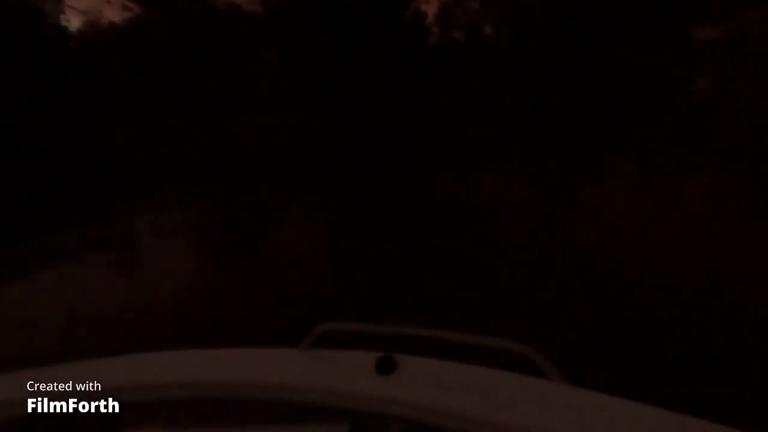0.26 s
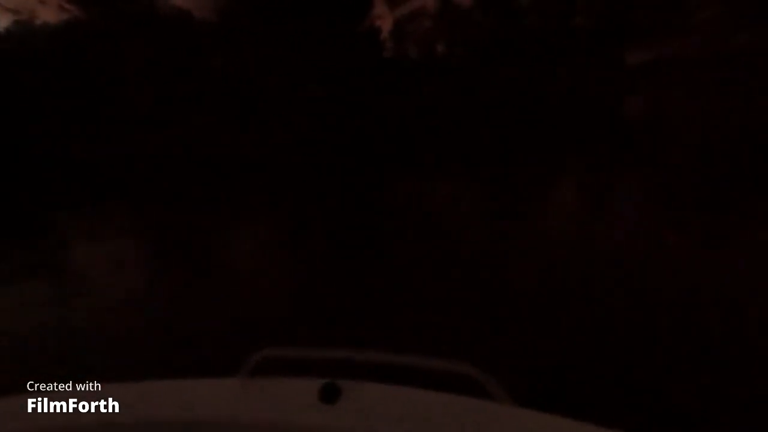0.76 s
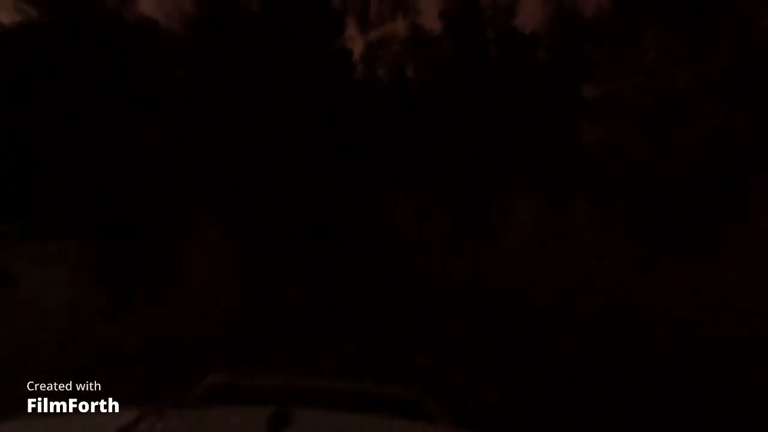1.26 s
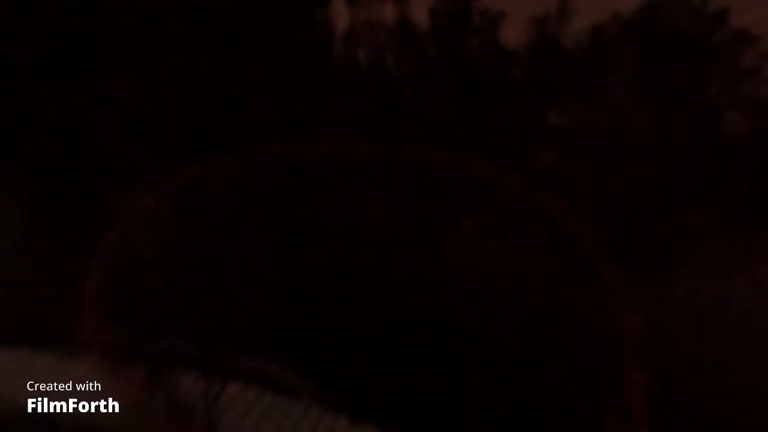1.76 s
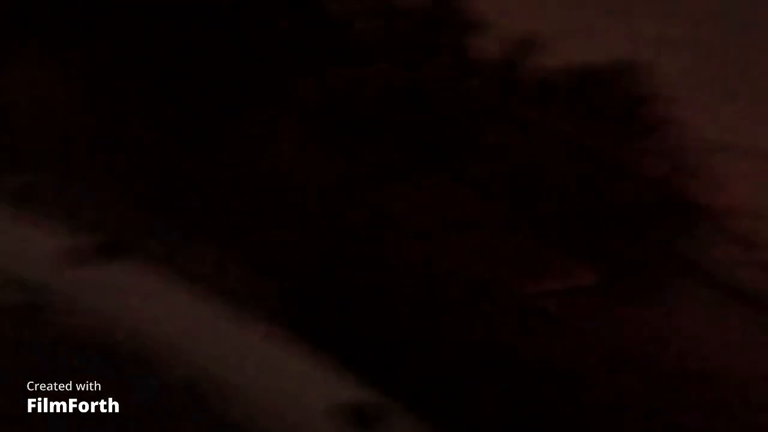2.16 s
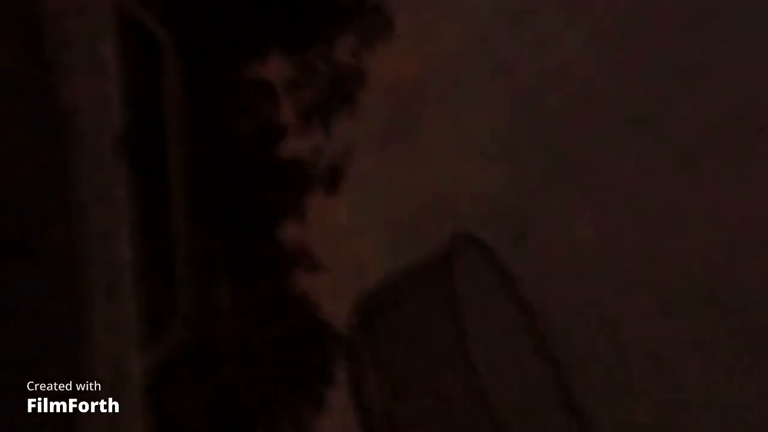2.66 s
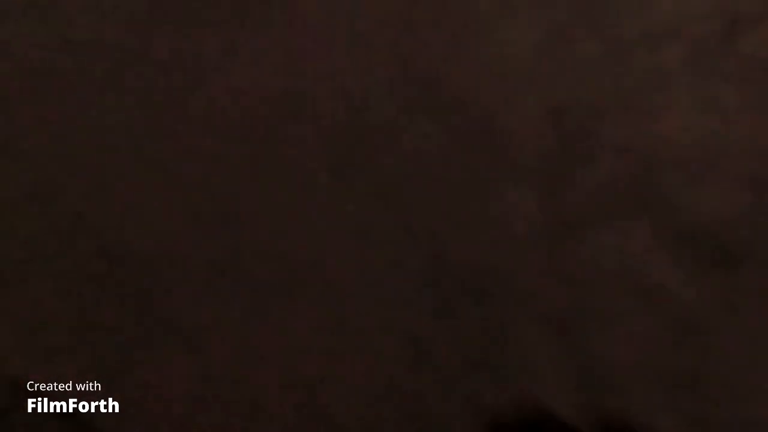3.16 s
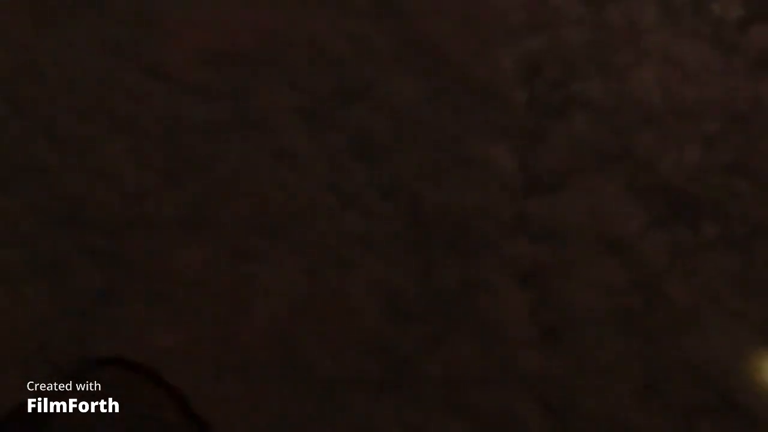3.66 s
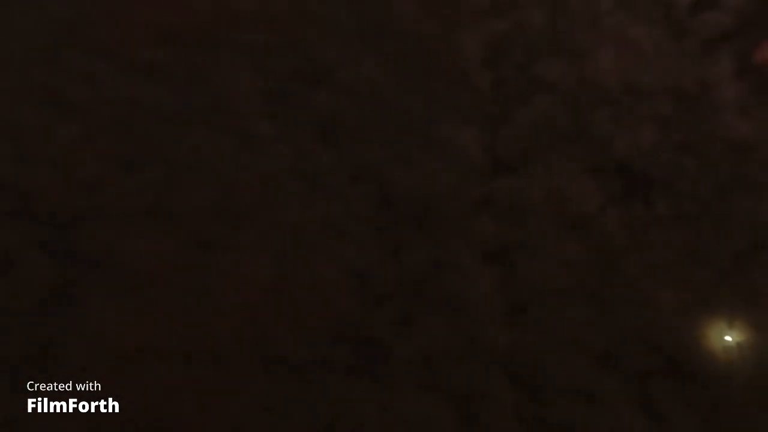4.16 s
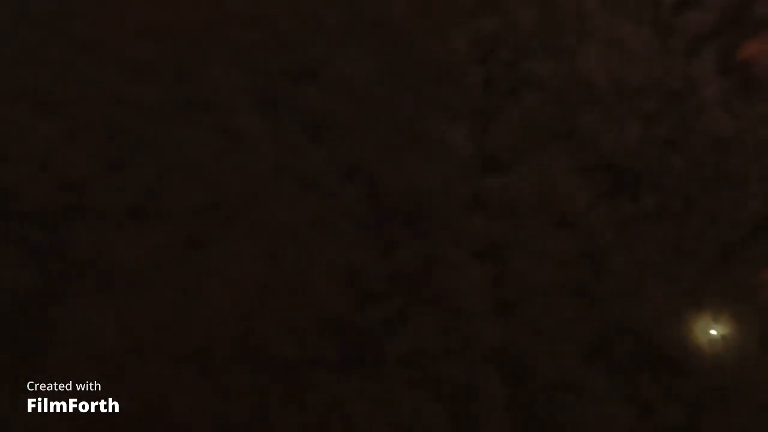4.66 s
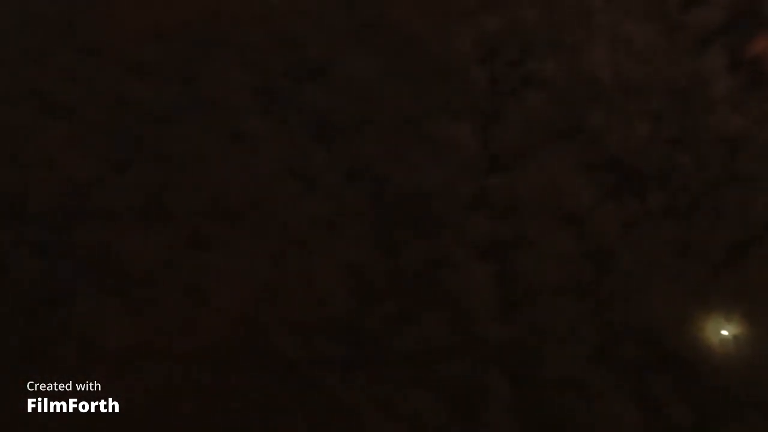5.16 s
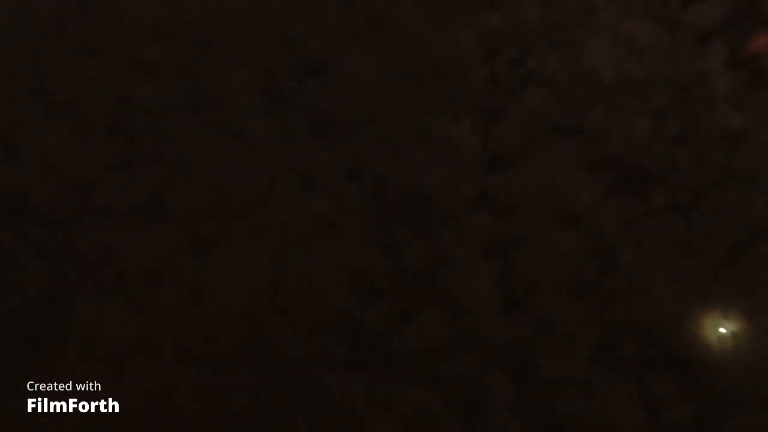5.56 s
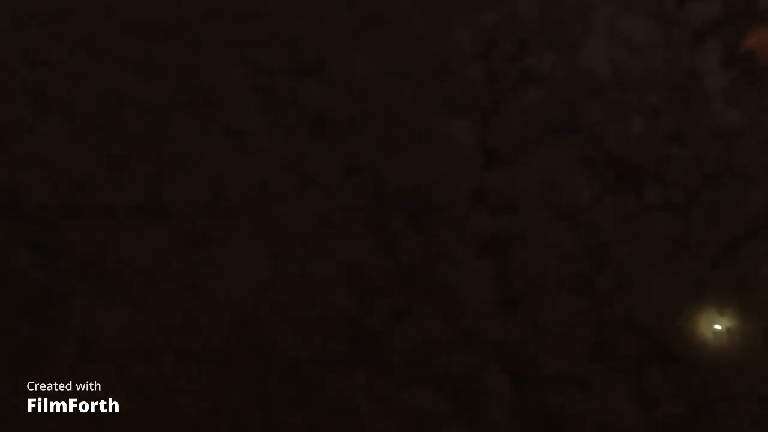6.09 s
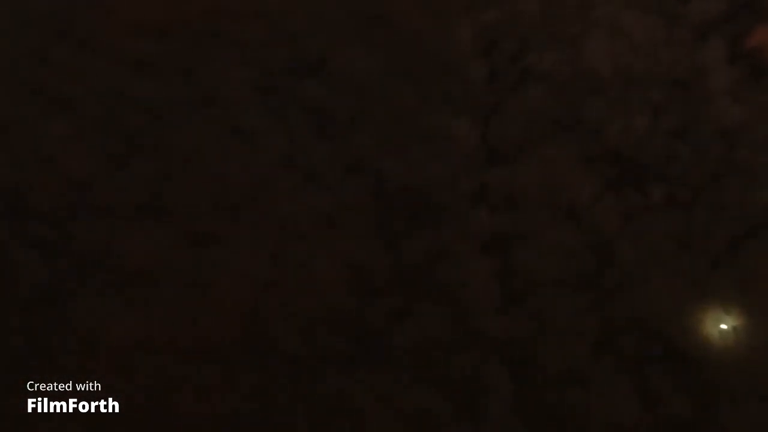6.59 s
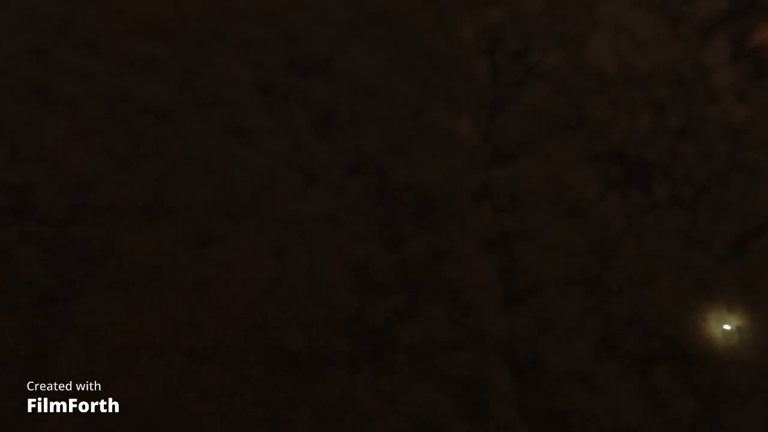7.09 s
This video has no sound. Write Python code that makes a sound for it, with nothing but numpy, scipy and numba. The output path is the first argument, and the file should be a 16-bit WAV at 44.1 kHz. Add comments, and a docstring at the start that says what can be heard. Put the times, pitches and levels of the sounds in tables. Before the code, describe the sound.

From 0 to 2 seconds, two distant insect choirs hold a steady, high, rapidly throbbing hiss in wide stereo over a quiet night lake. Soft low lurches, drips and bright plinks sound in a metal boat around 0.5 to 1 second, with a faint thin rub near 1.5 and watery plops just after 1.9. From 2.1 to 2.7 the boat tips: deep rumble, gurgles, brushing swishes and dull thumps. At 3.1 to 3.4 come the loudest bumps and hard hollow knocks as the microphone is jostled. After about 3.5 it is covered: insects fade to a muffled trace and the image narrows. Close sloshing and bubbling gulps continue, strong near 3.7, 4.3, 5.2 and 6.1, with soft hull thuds, ticks and a small squeak at 6.1. A sharp knock lands near 6.45, a thump near 6.6, then water thins out before a last dull bump at 7.25.

```python
"""Two insect choirs drone over a lake at night: throbbing band noise, heard by a small recorder aboard a metal boat.
Water drips and gurgles in the hull: gliding damped sines and band noise. The boat tips; the recorder rumbles and
swishes (swelling noise), is knocked about (contact noise and hull modes) and ends up covered: choirs muffled,
both ports alike, water sloshing close by and dull bumps (damped sines) coming through the hull."""
import sys
import numpy as np
from scipy import signal
from scipy.io import wavfile
from scipy.ndimage import uniform_filter1d
from numba import njit

SR = 44100
rng = np.random.default_rng(int(sys.argv[2]) if len(sys.argv) > 2 else 0)


def volts_from_decibels(level):
    """Turn decibel levels (scalar or array-like) into linear amplitude factors."""
    exponent = np.asarray(level, float) / 20
    return 10 ** exponent


def wav_record(signal):
    """Record a signal, one row per channel, as 16-bit PCM in the file named by sys.argv[1]."""
    frames = np.transpose(np.atleast_2d(signal))
    bounded = np.clip(frames, -1, 1)
    # unit amplitude maps onto the largest positive 16-bit level
    quanta = np.round(bounded * 32767).astype(np.int16)
    wavfile.write(sys.argv[1], SR, quanta)


N = 323253
T = np.arange(N) / SR
COVERED_S = 3.47  # pairs of settings below are (open, covered)

# Table values are nominal: the functions trim levels, times and pitches.
# how open the microphone lies: t/s, low choir level/dB, high choir level/dB
CHOIR_LEVELS = [(0, -58.5, -55), (.84, -57.5, -58.5), (1.61, -58, -54), (2.33, -59, -57.5),
                (2.88, -62, -61.5), (3.2, -74, -71), (3.4, -81, -83), (3.82, -63.5, -70), (4.35, -87, -84),
                (5.5, -74, -81), (6.0, -79, -87), (6.45, -75, -77), (6.96, -72.5, -78.5),
                (7.33, -70.5, -73)]
# how unlike the ports hear: t/s, side-mid level/dB, bass side-mid level/dB, bass left-right level/dB
PORT_SPREAD = [(0, -4.5, -18, -1), (1.8, -5, -12, -2.5), (2.1, -5.5, -9.5, -4), (3.45, -4, -10, -3),
               (3.55, -17, -35, 1), (3.6, -13.5, -49, -0.5), (3.95, -32, -50, 0), (5.75, -37.5, -37, -2),
               (6.0, -15.5, -52, 0), (6.5, -11, -45, -0.5), (6.9, -9, -34, 0.5), (7.33, -10, -36, 0)]


def curves(table):
    """Columns of a table joined by straight lines in time."""
    s, *columns = np.transpose(table)
    return [np.interp(T, s, c) for c in columns]


def unit(x):
    """Scale to rms 1."""
    return x / np.sqrt(np.mean(x ** 2))


def noise():
    """White noise."""
    return rng.standard_normal(N)


@njit
def svf(x, hz, width):
    """State-variable band-pass whose centre and width may move."""
    y, b, l = np.empty(len(x)), 0., 0.
    for i in range(len(x)):
        g, k = np.tan(np.pi * hz[i] / SR), width[i] / hz[i]
        v = (b + g * (x[i] - l)) / (1 + g * (g + k))
        b, l, y[i] = 2 * v - b, l + 2 * g * v, k * v
    return y


def band(x, hz, width):
    """Steep band-pass: the same resonance twice."""
    hz, width = hz * np.ones(len(x)), width * np.ones(len(x))
    return svf(svf(x, hz, width), hz, width)


@njit
def rings(s, size, hz, t60, glide, rise):
    """Damped sines that swell in over rise seconds and glide by octaves per s; each stops at its t60."""
    y = np.zeros(N)
    for e in range(len(s)):
        i0, phase = int(s[e] * SR), 0.
        for i in range(min(int(t60[e] * SR), N - i0)):
            t = i / SR
            phase += 2 * np.pi * hz[e] * 2 ** (glide[e] * t) / SR
            y[i0 + i] += size[e] * np.sin(phase) * 1000 ** (-t / t60[e]) * min(1., t / rise)
    return y


def walk(rate):
    """Random levels held 1 / rate s and slewed twice; spread near 1."""
    k = int(SR / rate)
    held = np.repeat(rng.standard_normal(N // k + 1), k)
    return 1.32 * uniform_filter1d(uniform_filter1d(held, k), k)[:N]


def wavering(hz, spread, rate):
    """A tone of rms 1 whose pitch wanders."""
    return np.sqrt(2) * np.sin(2 * np.pi * np.cumsum(hz * (1 + spread * walk(rate))) / SR)


def swells(s, db, rise, fall):
    """Gain of overlapping swells, each climbing 20 dB in rise s to its peak and sinking 20 dB in fall s."""
    t = T[::64, None] - s
    slope = np.minimum(t / np.maximum(rise, .003), -t / np.maximum(fall, .003))
    power = volts_from_decibels(2 * (db + 20 * slope))
    return np.interp(T, T[::64], np.sqrt(power.sum(axis=1)))


def ports(mid, side, extra_db=0, axis=0):
    """Left and right from a common part and an unlike part that fades when the casing is covered."""
    return mid + volts_from_decibels(curves(PORT_SPREAD)[axis] + extra_db) * side * np.array([[1], [-1]])


def panned(x, s, pan_db, axis=1):
    """One sound leaning left or right, less so the more alike the ports hear."""
    spread = np.transpose(PORT_SPREAD)
    pan_db = pan_db * min(1, volts_from_decibels(np.interp(s, spread[0], spread[axis]) + 4.5))
    return x * volts_from_decibels(np.array([[pan_db], [-pan_db]]) / 2)


def insects():
    """Distant choirs: narrow hiss throbbing with the wing strokes of the nearest singers."""
    # choir bands: f/Hz, width/Hz, throb rate/Hz
    choir_bands = [(4120, 680, 58), (6760, 820, 58), (7434, 470, 43)]
    low_db, high_db = curves(CHOIR_LEVELS)
    out = 0
    for (hz, width_hz, rate_hz), db in zip(choir_bands, (low_db, high_db - 3, high_db - 8.5)):
        throb_phase = 2 * np.pi * np.cumsum(rate_hz * (1 + 0.0638 * walk(4.6))) / SR
        throb = 1 + 0.27 * np.sin(throb_phase)
        mid, side = (unit(band(noise(), hz, width_hz)) for _ in range(2))
        out = out + volts_from_decibels(db - 3.5 + 0.26 * walk(14.0)) * throb * ports(mid, side, -5.5)
    return out


def night():
    """Smooth floor in half-octave bands, and a faint wavering hum."""
    # floor spectrum: f/Hz, relative density/dB
    floor_spectrum = [(120, -31), (200, 4), (282, -4), (512, -17), (708, -70.5), (1130, -12), (2850, -29),
                      (4240, -32), (5170, -69), (7020, -50.5), (15000, -77)]
    # hum coming and going: t/s, level/dB
    hum_levels = [(0, -70), (1.5, -68.5), (4.3, -76), (4.6, -60.5), (5.0, -72), (6.4, -70.5), (6.8, -60),
                  (7.33, -56)]
    floor_db, hum_hz = -70.5, 174.4
    spectrum_hz, spectrum_db = np.transpose(floor_spectrum)
    floor = 0
    for hz in 220 * 2 ** np.arange(0, 6.1, .5):
        db = np.interp(np.log(hz), np.log(spectrum_hz), spectrum_db) + 1.5 * walk(6)
        floor = floor + volts_from_decibels(db) * ports(band(noise(), hz, hz / 2), band(noise(), hz, hz / 2))
    hum = 0.93 * wavering(hum_hz, 0.0432, 25) + 0.48 * unit(band(noise(), hum_hz, 40))
    return volts_from_decibels(floor_db) * unit(floor) + volts_from_decibels(curves(hum_levels)[0]) * hum


def gurgles():
    """Gain of the big bubbles, their centre, and gain of the small bubbles each gulp throws on the casing."""
    # gulps against the hull: peak t/s, level/dB, 20 dB fall/s, centre f/Hz, small-big bubbles level/dB
    gulps = [(.25, -69, 0.42, 470, -21), (.47, -52, 0.05, 370, -5.5), (.72, -80, 0.086, 600, 2),
             (1.26, -68, 0.3, 420, -29), (1.34, -76, 0.027, 710, -24), (1.43, -66, 0.15, 730, -9),
             (1.689, -66.5, 0.12, 457, -17), (1.83, -68, .06, 385, -2), (1.94, -53, 0.032, 660, 13),
             (2.17, -50, 0.034, 378, -11), (2.218, -49, 0.029, 373, -20), (2.29, -49.5, 0.12, 376, -17),
             (2.52, -70, 0.036, 345, -21), (2.6, -64, .2, 367, -16), (3.05, -62, .1, 354, -13),
             (3.25, -43, 0.3, 374, -8), (3.439, -43, 0.043, 400, -21), (3.569, -49, 0.21, 600, -4.5),
             (3.667, -33.5, 0.064, 441, -12), (3.73, -42, 0.072, 477, -4.5), (3.82, -47.5, 0.22, 593, -13),
             (4.0, -55.5, 0.67, 540, -18), (4.142, -38.5, 0.029, 534, -4), (4.27, -58, 0.041, 443, 10),
             (4.337, -36.5, 0.061, 570, 1), (4.53, -52, 0.34, 600, -14), (4.618, -50, 0.025, 623, 1),
             (4.902, -43, 0.087, 484, -13), (4.99, -42.5, 0.17, 412, -17), (5.048, -48, 0.033, 576, -7),
             (5.15, -61.5, .03, 510, 15), (5.22, -33.5, 0.077, 375, -7), (5.268, -31.5, 0.049, 464, -13),
             (5.34, -41, 0.36, 503, -11), (5.52, -42, 0.2, 497, -21), (5.64, -60, 0.16, 560, -6),
             (5.7, -62, 0.028, 727, 11), (5.911, -52, 0.15, 670, 6), (6.01, -40.5, .1, 613, -12),
             (6.08, -34, 0.2, 550, -13), (6.13, -36.5, 0.035, 500, -9), (6.202, -37.5, 0.48, 550, -15.5),
             (6.288, -36, 0.11, 415, -5), (6.548, -39.5, 0.23, 582, -10.5), (6.65, -59, 0.027, 450, 10),
             (6.72, -50.5, 0.04, 491, 2.5), (6.816, -48, .05, 400, 1.5), (6.925, -60.5, .04, 510, 9),
             (7.08, -69, 0.14, 456, -13), (7.31, -71, .1, 365, 4)]
    s, db, fall, hz, casing_db = np.transpose(gulps)
    rise = 0.54 * fall
    return swells(s, db, rise, fall), np.interp(T, s, hz), swells(s, db + casing_db, rise, fall)


def rumble():
    """Lumpy low noise, uneven between ports: a slow sway, sudden lurches and the thump of big bubbles."""
    # slow sway of the hull: t/s, deep level/dB
    sway_levels = [(0, -46), (.4, -51.5), (.9, -48.5), (1.1, -50.5), (1.35, -58), (1.6, -53), (1.95, -44.5),
                   (2.06, -34), (2.21, -31), (2.4, -26), (2.62, -32), (2.76, -49), (2.9, -31.5), (3.0, -49),
                   (3.32, -38), (3.52, -74), (3.86, -47), (4.06, -88), (4.5, -90), (4.8, -59), (5.8, -73),
                   (6.5, -68), (7.33, -80)]
    # sudden lurches of the hull: peak t/s, level/dB, 20 dB rise/s, 20 dB fall/s, deep part above it/dB
    lurch_swells = [(.16, -39.5, .05, 0.13, -5), (0.472, -35, 0.01, 0.13, -3), (1.53, -43, 0.054, 0.29, 5),
                    (2.139, -23.5, 0.065, 0.089, 0), (2.408, -30.5, 0.035, 0.044, 13),
                    (2.5, -23.5, 0.032, 0.22, 3.5), (2.619, -31, 0.11, 0.077, 10.5),
                    (2.79, -48, 0.043, 0.16, 19.5), (3.071, -30.5, 0.015, .4, -16),
                    (3.3, -35, 0.63, .3, -8), (3.443, -21, 0.38, 0.073, -18),
                    (3.6, -33.5, 0.026, 0.21, -22), (3.7, -34, .1, 0.25, -11),
                    (4.01, -40.5, .06, 0.024, -16), (4.15, -59, .05, 0.049, -4),
                    (4.6, -38.5, 0.091, 0.24, -3), (4.72, -40.5, 0.12, 0.11, -7),
                    (5.05, -42, 0.085, 0.12, -10), (5.43, -32.5, 0.027, 0.11, -10),
                    (6.1, -42.5, 0.1, .15, -14), (6.25, -37.5, .1, 0.19, -5), (6.34, -42, 0.12, 0.073, -15),
                    (6.635, -32, .012, 0.12, -8), (6.7, -33.5, 0.098, .08, -18), (7.03, -75, .05, 0.13, 11),
                    (7.26, -39, .05, 0.66, -6)]
    s, db, rise, fall, deep_db = np.transpose(lurch_swells)
    sway, lurch = volts_from_decibels(curves(sway_levels)[0]), swells(s, db, rise, fall)
    deep = np.hypot(sway * volts_from_decibels(2.0 * walk(18)), swells(s, db + deep_db, rise, fall))
    middle = np.hypot(volts_from_decibels(-12.5 + 4.0 * walk(17)) * sway, lurch)
    upper = volts_from_decibels(-27.5) * sway + volts_from_decibels(-20.5) * lurch + volts_from_decibels(-4.5) * gurgles()[0]
    pair = []
    for _ in range(2):
        deep_part = deep * unit(band(noise(), 29.3, 25))
        middle_part = volts_from_decibels(-5.5) * middle * unit(band(noise(), 84.0, 77.5))
        upper_part = upper * volts_from_decibels(-10.5 + 4.9 * walk(30)) * unit(band(noise(), 228.4, 124))
        pair.append(deep_part + middle_part + upper_part)
    lean_db = curves(PORT_SPREAD)[2]
    return volts_from_decibels(-1.0) * ports(*pair, axis=1) * volts_from_decibels(np.array([lean_db, -lean_db]) / 2)


def slosh(count=3500):
    """Dense bubbles: big ones around a moving centre, small ones ringing the casing, over flickering wash and fizz."""
    # wash over the casing: t/s, level/dB
    wash_levels = [(0, -73), (.8, -69), (1.3, -73.5), (1.75, -70.5), (2.2, -59), (2.5, -60), (2.95, -64.5),
                   (3.25, -55), (3.45, -79), (3.5, -78), (3.75, -52), (4.1, -58.5), (4.3, -54), (4.46, -60),
                   (4.7, -52), (5.1, -57.5), (5.5, -49), (5.69, -47.5), (5.75, -55), (6.2, -57.5),
                   (6.82, -59), (6.88, -68), (7.33, -74)]
    (gulp, centre_hz, thrown), wash = gurgles(), volts_from_decibels(curves(wash_levels)[0])
    fizz_gain = volts_from_decibels(np.where(T > COVERED_S, -7, -2))
    big_gain = volts_from_decibels(-3.0) * gulp + volts_from_decibels(np.where(T > COVERED_S, -11.5, -20)) * wash
    casing_gain = np.hypot(wash, thrown) * volts_from_decibels(-1.0)
    lows, highs = [], []
    for _ in range(2):
        u, g = rng.random((2, count)), rng.standard_normal((4, count))
        e = np.minimum(rng.exponential(size=(2, count)), 4)
        big_hz = centre_hz[(u[0] * N).astype(int)] * 2 ** (0.327 * g[0])
        small_hz = 1300 * 2 ** (0.33 * g[1])
        hz = np.clip([big_hz, small_hz], 150, 4000)
        big, small = (unit(rings(u[k] * T[-1], volts_from_decibels(6.9 * e[k]), hz[k], 18 / hz[k], 5 + 5 * g[2 + k], 0.0026))
                      for k in range(2))
        low_wash = volts_from_decibels(3.2 * walk(35)) * unit(band(noise(), centre_hz, 1.15 * centre_hz))
        casing_wash = volts_from_decibels(1.1 * walk(40)) * unit(band(noise(), 1260, 820))
        low = 0.63 * big + 0.58 * low_wash
        casing = 0.67 * small + 0.67 * casing_wash
        flicker = volts_from_decibels(2.2 * walk(70))
        fizz = fizz_gain * flicker * unit(band(band(noise(), 2240, 3460), 2240, 3460))
        lows.append(big_gain * low)
        highs.append(casing_gain * casing + (wash + volts_from_decibels(-16) * thrown) * fizz)
    return ports(*lows, -14) + ports(*highs)


def brushing():
    """Soft hiss of something brushing the casing: two noise bands swelling over a rest of leaves and air."""
    # strokes: peak t/s, level/dB, 20 dB rise/s, 20 dB fall/s, top band above it/dB
    strokes = [(.84, -65, 1, .5, -14), (1.02, -68, .3, 1, 0), (1.93, -52, .04, 0.092, -6),
               (1.99, -56, .1, 0.037, -19), (2.08, -54.5, .05, .09, -27), (2.16, -47, 0.02, 0.097, -7),
               (2.29, -51, .06, 0.08, -7), (2.41, -45.5, 0.043, 0.078, -16),
               (2.491, -44.5, 0.021, .045, -4), (2.63, -44.5, 0.055, 0.039, -19), (2.7, -58, .05, 0.11, -5),
               (2.88, -59, 0.19, 0.18, -3), (3.06, -50.5, .01, 0.067, -20), (3.11, -53, .03, .06, 1),
               (3.2, -48, 0.13, 0.089, -8), (3.255, -49, .1, .012, -14), (3.32, -54.5, 0.057, 0.044, -12),
               (3.35, -51, 0.009, 0.015, -16), (3.41, -66, 0.013, .011, -19),
               (3.531, -56, 0.0055, 0.045, -9), (3.8, -60, 0.22, .1, -11), (3.84, -57, 0.043, .03, -6),
               (3.88, -61.5, .05, .45, -10), (4.15, -60, 0.02, 0.079, -10), (4.35, -81, .3, 0.049, -1),
               (4.56, -70, .02, .4, -9), (4.75, -60, 0.34, .08, -6), (4.8, -53, .02, 0.042, -5),
               (5.12, -74, .5, .6, -2), (5.58, -65, .02, .07, -27), (5.66, -79, .1, .6, -18),
               (6.03, -82, 0.47, 0.17, 3), (6.27, -52.5, 0.021, 0.044, -13),
               (6.472, -61.5, 0.33, 0.037, -8), (6.722, -63, 0.072, 0.038, -18), (6.8, -71, .1, 0.2, -20),
               (7.27, -68, .05, 0.059, 0.5)]
    s, db, rise, fall, top_db = np.transpose(strokes)
    rest = volts_from_decibels(curves(CHOIR_LEVELS)[0] - 30)  # muffled like the choirs
    hiss_gain = rest + swells(s, db, rise, fall)
    top_gain = volts_from_decibels(4.5) * rest + swells(s, db + top_db, rise, fall)
    pair = []
    for _ in range(2):
        flutter = volts_from_decibels(0.89 * walk(42))
        hiss = hiss_gain * unit(band(noise(), 5390, 3400))
        top = top_gain * volts_from_decibels(-9.0) * unit(band(noise(), 11500, 4700))
        pair.append(flutter * (hiss + top))
    return volts_from_decibels(-5.5) * ports(*pair, 0.8)


def bumps():
    """A bump dents a panel, which swings back gliding in pitch, with an overtone, body ring and lasting boom."""
    # dull thuds: t/s, peak level/dB, f/Hz, glide/(octave/s), left-right level/dB
    thuds = [(.147, -27.5, 70, -2, -3), (0.46, -31, 72, -9, 2), (1.522, -32, 98, -4, 2),
             (2.139, -18.5, 133, 2, -21), (2.419, -20, 114, -4, -11), (2.519, -18.5, 185.6, -3.5, -26.5),
             (2.587, -16.5, 72, -3, -12), (3.103, -0.5, 91, -18, 7), (3.118, -17, 181, -22.5, -16),
             (3.141, -15.5, 94, -9, -11), (3.2439, -11.5, 108, -6.5, -20), (3.273, -16, 114, -11, -8),
             (3.352, -6.5, 101, -15.5, 5.5), (3.402, -13, 116, -9.5, 3), (3.444, -32, 127, -9, 5),
             (3.699, -39, 71.6, 3, 0), (3.825, -39, 174, -14, 0), (4.137, -49.5, 172, -10, 0),
             (4.574, -41, 91.5, 3, 0), (4.63, -33, 71.4, -4.5, 0), (5.021, -38.5, 71.4, -5, 0),
             (5.409, -37, 86.1, -14, 0), (5.487, -35, 115, -8.5, 0), (6.455, -42.5, 190, -12, 0),
             (6.617, -24.5, 85, -1.5, 0), (6.628, -21, 88, 5, 1), (6.664, -28, 74, -1.5, -2),
             (7.24, -30.5, 110, -2, -1), (7.256, -27, 96.4, -3, -4)]
    half_length_glide = 16.3  # octaves per s at which a hard thud is half as long
    body_hz, body_t60_s, boom_hz, boom_t60_s = 345, 0.049, 110, 0.29
    out = 0
    for s, db, hz, glide, pan_db in thuds:
        covered = s > COVERED_S
        short = 1 / (1 + (glide / half_length_glide) ** 2)
        rise = (0.0064, 0.011)[covered] * short * volts_from_decibels(-.7 * max(db + 23.5, 0))
        t60 = (0.061, 0.16)[covered] * short
        body_db, boom_db = (-19.5, -32)[covered], (-18.5, -31)[covered]
        # panel, overtone, body, boom
        starts = s + np.array([0.0029, 0.0023, 0.0045, .006])
        sizes = volts_from_decibels(db + np.array([2.5, -5, body_db, boom_db])) * np.array([1, -1, 1, -1])
        tones_hz = np.array([1.103 * hz, 2.11 * hz, body_hz, boom_hz])
        t60s = np.clip([t60, 0.45 * t60, body_t60_s, boom_t60_s], .01, .5)
        glides = glide * np.array([1., 1, 0, 0])
        tones = rings(starts, sizes, tones_hz, t60s, glides, max(rise, .0005))
        out = out + panned(tones, s, pan_db, axis=2)
    return out


def bubbles():
    """Air pockets pinching off: pure short tones that glide."""
    # single bubbles: t/s, peak level/dB, f/Hz, t60/s, glide/(octave/s)
    pockets = [(.256, -51.5, 535, 0.067, 6), (0.511, -37.5, 1052, 0.084, -2),
               (0.709, -39, 1020, 0.069, 3.5), (.765, -50, 1305, 0.098, 8.5), (0.971, -44, 3110, 0.092, -5),
               (1.07, -51, 1043, .05, -4), (1.648, -41, 3190, 0.057, 3), (1.333, -48, 723, 0.097, 2),
               (1.427, -43.5, 810, 0.071, 33), (1.912, -26.5, 1130, 0.028, -14),
               (1.944, -33, 650, 0.12, -2.5), (1.948, -41.5, 1295, 0.15, 3), (1.982, -39, 1996, .06, 7),
               (2.153, -16.5, 353, 0.042, 5), (3.665, -29, 405, 0.056, 5), (4.305, -31.5, 258, 0.14, 8),
               (5.215, -19.5, 380.6, 0.097, -2.5), (5.264, -23, 505, 0.069, 3), (5.345, -23, 495, 0.046, 0),
               (6.062, -13, 623, 0.026, 18), (6.084, -19, 665, 0.022, 5), (6.145, -20, 380, 0.034, 1),
               (6.198, -22, 202, 0.054, -2), (6.283, -18, 438, 0.04, 2), (6.334, -25, 147, .05, -21)]
    s, db, hz, t60, glide = 1. * np.transpose(pockets)
    return rings(s, volts_from_decibels(db - 2.5), hz, np.clip(t60, .01, .3), glide, 0.0054)


def knocks():
    """Knocks, drips, plops: scattered contact noise in the struck spot's resonance, a crack, hull modes, rattle."""
    # blows: peak t/s, level/dB, f/Hz, treble level/dB, left-right level/dB
    blows = [(.409, -54.5, 6700, 3.5, .5), (0.51, -37.5, 1070, -26, -5), (0.5332, -36.5, 1900, -26, -2),
             (0.542, -36, 1530, -3, -4), (0.666, -43, 4000, -23, -1.5), (0.6897, -38, 3120, -18, -5),
             (0.702, -30, 1690, -9, -4.5), (.897, -38.5, 6200, -11, 2), (.962, -40, 3000, -25, 1.5),
             (.975, -37, 2700, -25, 3), (0.9883, -42, 3700, -24, .5), (1.333, -45, 3800, -7, -2),
             (1.616, -34.5, 1260, -26, 1), (1.645, -36, 3280, -23, .5), (1.915, -33.5, 1030, -14, 0),
             (1.939, -30, 740, -8.5, -1), (1.95, -27, 1830, -29, 0), (1.979, -32.5, 2050, -14, 0),
             (1.9954, -40, 2430, -20, -.5), (2.075, -44.5, 600, -2.5, -2), (2.128, -40.5, 1520, -11, 2),
             (2.154, -27.5, 1430, -15.5, 0), (2.268, -31, 1680, -25, -5), (2.321, -38, 1070, -19, 0),
             (2.384, -48, 649, -3, -10), (2.685, -43, 1030, -6, -5), (2.787, -29.5, 1400, -31, 2),
             (3.056, -41, 1620, -12, 1.5), (3.07, -41.5, 1700, -6, 3), (3.103, -16, 1230, -18, -7),
             (3.244, -10.5, 1090, -18.5, -5), (3.276, -30.5, 1000, -30, 6), (3.338, -30, 1820, -35, -2),
             (3.343, -30, 1840, -37, -5), (3.348, -24, 1840, -24, -7), (3.351, -11, 1450, -11.5, 3),
             (3.403, -21.5, 1660, -25, 2), (3.493, -43.5, 1100, -33, 6), (3.551, -35.5, 594, -25, 10),
             (3.612, -33, 549, -28, 0), (3.662, -25, 555, -31, 1), (3.719, -30, 1310, -20.5, 10),
             (3.827, -17, 1080, -27, -5), (3.877, -36.5, 1050, -20, -4), (4.136, -30.5, 1100, -20, 3),
             (4.165, -42, 2000, -20, 0), (4.214, -42, 980, -26, 0), (4.268, -38, 1250, -36, 0),
             (4.304, -30, 597, -67, 0), (4.328, -22.5, 885, -50, -10), (4.582, -40.5, 720, -10.5, 0),
             (4.615, -40, 1150, -20, 0), (4.741, -39.5, 1250, -12.5, 1), (4.819, -53, 1080, -13, -5),
             (4.882, -40.5, 1100, -26, 0), (4.919, -37.5, 895, -35, 0), (5.053, -38, 966, -30, 0),
             (5.141, -41.5, 1050, -16, -7), (5.214, -30, 490, -40, 0), (5.235, -31.5, 990, -44, 0),
             (5.401, -31.5, 550, -22, -2), (5.458, -32.5, 720, -36, 3), (5.538, -33, 604, -41, 0),
             (5.778, -44, 1090, -29, 8), (5.846, -42.5, 1080, -34, 26), (5.914, -32.5, 900, -44, 3),
             (6.005, -31.5, 810, -29.5, 4), (6.062, -34, 700, -54, 5), (6.418, -37.5, 550, -10, 6),
             (6.451, -27, 958, -48, 6), (6.457, -13.5, 1000, -57, 3.5), (6.673, -40.5, 985, -34, 9),
             (6.713, -44, 610, -26.5, 3), (6.78, -36.5, 828, -37.5, 5), (6.912, -43, 1080, -29, 7)]
    # hull modes: f/Hz, level/dB, t60/s
    hull_modes = [(320, -4.5, 0.02), (630, -29, 0.12), (935, -5, 0.013), (1191, 1.5, 0.032),
                  (1407, -4, 0.034), (2050, -2.5, 0.0052), (2770, 10.5, 0.0041), (4060, 4, 0.0025)]
    lead_s = .03  # rattle starts this long before its peak
    out = np.zeros((2, N))
    t = T[:SR // 8]
    around = t - lead_s
    hull_hz, hull_db, hull_t60 = np.transpose(hull_modes)
    for s, db, hz, treble_db, pan_db in blows:
        covered = s > COVERED_S
        hard = volts_from_decibels(-0.07 * max(db + 25, 0))  # harder blows: shorter contact and ring
        rise = (.0016, 0.0056)[covered] * hard
        t60 = (0.034, 0.045)[covered] * (1000 / hz) ** 0.13 * hard
        contact = rng.standard_normal((4, len(t))) ** 3  # gritty: a few strong contacts among many weak
        shade = rng.standard_normal((2, len(hull_modes)))
        swell = np.minimum(t / max(rise, .0003), 1) ** 2
        after = np.maximum(t - rise, 0)
        spot_decay = 1000 ** (-after / max(t60, .004))
        spot = [unit(band(c, hz, 0.47 * hz)) * swell * spot_decay for c in contact[:2]]
        crack_decay = 1000 ** (-after / (0.011 + 0.52 * t60))
        crack = unit(band(contact[2], 4070, 3200)) * swell * crack_decay * volts_from_decibels(treble_db + 6.5)
        # modes near the struck spot ring most
        far_db = (0.5, 7)[covered] * np.abs(np.log2(hull_hz / hz))
        mode_size = volts_from_decibels(hull_db - far_db + 1.9 * shade[0] - 13)
        modes = np.sin(2 * np.pi * hull_hz * (1 + 0.023 * shade[1]) * t[:, None])
        hull = swell * (mode_size * modes * 1000 ** (-after[:, None] / hull_t60)).sum(axis=1)
        side_gain = volts_from_decibels(np.interp(s, *np.transpose(PORT_SPREAD)[:2]) - 2.5)
        unlike = side_gain * spot[1] * np.array([[1], [-1]])
        # loose parts rattle around the blow: a quick build-up and a longer tail
        rattle_shape = 1000 ** np.minimum(around * hard / (5 * rise), -around * hard / (2.25 * t60))
        rattle_gain = volts_from_decibels(db + (-18.5, -15)[covered])
        rattle = rattle_gain * unit(band(contact[3], hz, 0.86 * hz)) * rattle_shape
        j = int((s + .002 - lead_s) * SR)
        out[:, j:j + len(t)] += panned(rattle, s, pan_db)[:, :N - j]
        blow = volts_from_decibels(db - 7.5) * (panned(spot[0] + crack + hull, s, pan_db) + unlike)
        i = int((s + .002 - rise) * SR)
        out[:, i:i + len(t)] += blow[:, :N - i]
    return out


def ticks():
    """Thin ticks on the casing: noise that scatters for a few milliseconds."""
    # t/s, peak level/dB, left-right level/dB
    tick_list = [(0.41, -67, 3.0), (0.5462, -56, -2.5), (0.6764, -50, -1.0), (0.72, -42, -0.5),
                 (0.8984, -56, 5.5), (1.3349, -51, 9), (1.5306, -48, -2.0), (1.6531, -55, 4.0),
                 (1.7789, -61, 4.0), (1.8253, -73, -8), (1.922, -30, 5), (1.9804, -49, 3.5),
                 (2.0986, -62, -6), (2.1296, -60, 3.0), (2.1535, -57, 2.5), (2.3835, -25, 4),
                 (2.7426, -40, 6), (3.1027, -29.5, 12), (3.141, -46, 10.5), (3.243, -44, 12),
                 (3.3533, -60, 1), (3.4032, -80, -0.5), (3.5354, -63, 3.5), (3.7618, -52, 2),
                 (3.8142, -48, -5), (3.8302, -55, 13), (4.1405, -69, 2.5), (4.1806, -52, 5),
                 (4.3106, -70, 8), (4.5484, -55, 16.5), (4.5962, -47, 21), (4.6428, -49.5, 9),
                 (4.6798, -55, 11), (4.6985, -39.5, 6), (4.7424, -51, 14), (4.796, -41, 5),
                 (5.0843, -63, 3.5), (5.4081, -62, 18), (6.0048, -51, 9), (6.4193, -51, 7)]
    t = T[:SR // 40]
    clicks = np.zeros((2, N + len(t)))
    for s, db, pan_db in tick_list:
        i = int(s * SR)
        gains = volts_from_decibels(db + 2.5 + np.array([[pan_db], [-pan_db]]) / 2)
        clicks[:, i:i + len(t)] += gains * rng.standard_normal(len(t)) * 1000 ** (-t / 0.0025)
    return np.array([band(c[:N], 6800, 13000) for c in clicks])


def squeaks():
    """Thin tones of something rubbing, part clean and part breathy, sliding in pitch and stuttering."""
    # start t/s, length/s, first f/Hz, last f/Hz, level/dB
    rubs = [(1.389, 0.095, 2076, 1850, -71), (1.462, 0.41, 1752, 1660, -64), (1.724, .17, 1030, 1250, -72),
            (2.805, 0.16, 2710, 2690, -70), (6.117, 0.24, 1777, 1690, -56), (6.22, 0.22, 2490, 2560, -65),
            (6.74, 0.11, 2710, 2725, -69.5)]
    out = 0
    for s, length, from_hz, to_hz, db in rubs:
        hz = np.interp(T, [s, s + length], [from_hz, to_hz])
        on = uniform_filter1d(1. * (T > s) * (T < s + length), SR // 50)
        stutter = volts_from_decibels(db + 1.2 * walk(25))
        tone = 1.04 * wavering(hz, 0.0089, 90) + 0.76 * unit(band(noise(), hz, 105))
        out = out + on * stutter * tone
    return ports(out, out, 0.85)


def scene():
    """All sources at the two ports."""
    steady = insects() + night() + rumble() + slosh() + brushing()
    return steady + bumps() + bubbles() + knocks() + ticks() + squeaks()


def roll_off(x):
    """The treble ends steeply here."""
    return signal.sosfilt(signal.butter(12, 15660, fs=SR, output="sos"), x)


def record(dry):
    """The recorder cuts the deepest bass and the top."""
    bass_cut = signal.butter(2, 20, "high", fs=SR, output="sos")
    top_cut = signal.ellip(8, .2, 70, 15500, fs=SR, output="sos")
    mix = signal.sosfilt(top_cut, signal.sosfilt(bass_cut, dry))
    return roll_off(mix)


dry = scene()
out = record(dry)
wav_record(out)
```